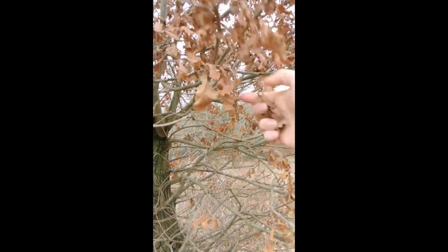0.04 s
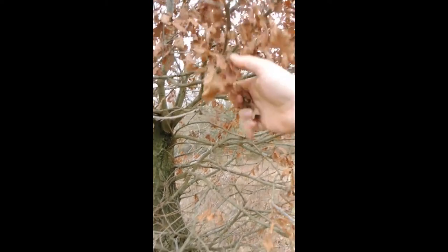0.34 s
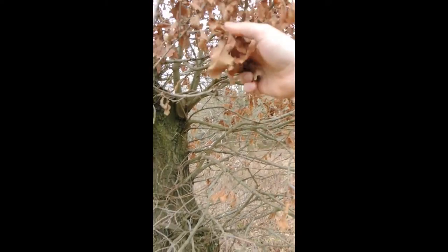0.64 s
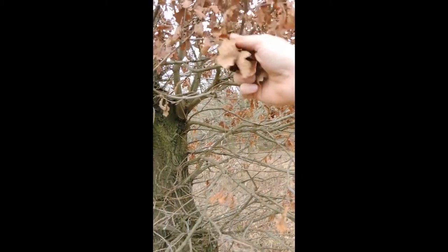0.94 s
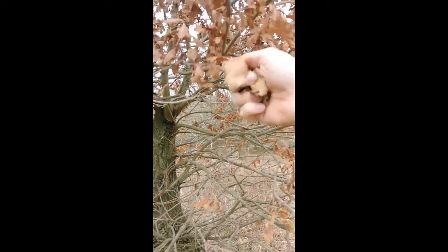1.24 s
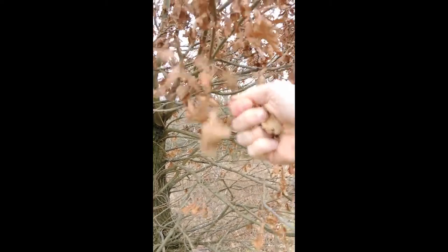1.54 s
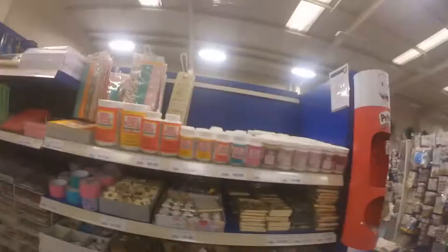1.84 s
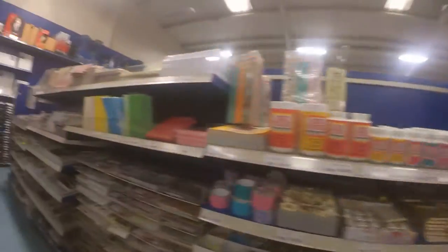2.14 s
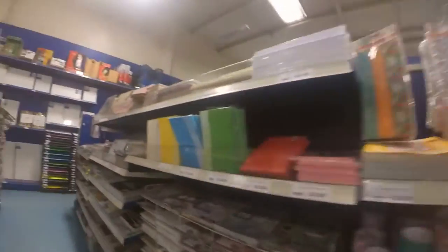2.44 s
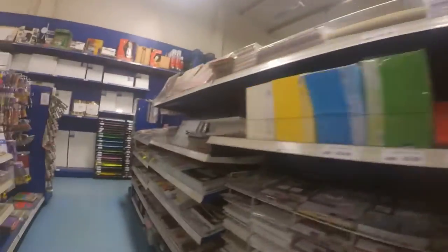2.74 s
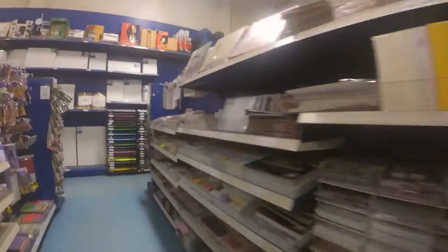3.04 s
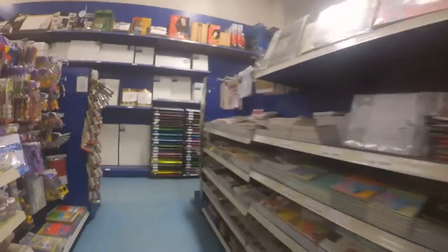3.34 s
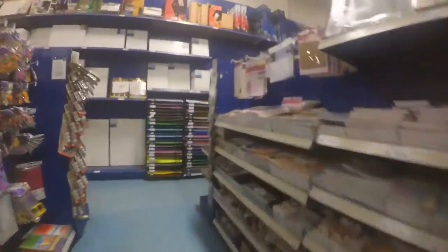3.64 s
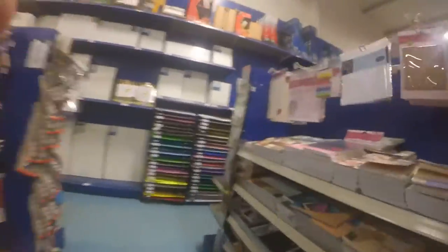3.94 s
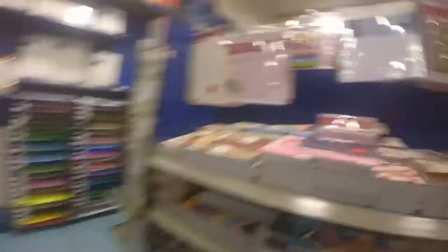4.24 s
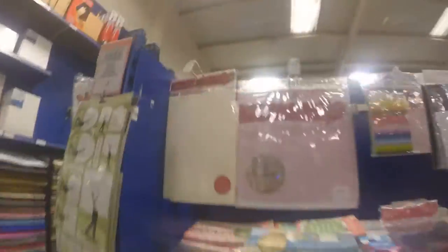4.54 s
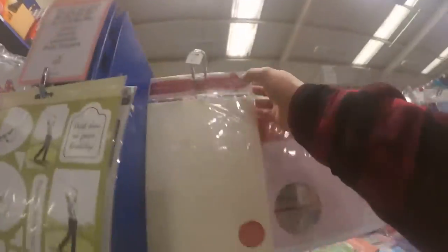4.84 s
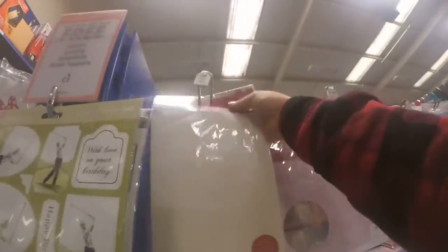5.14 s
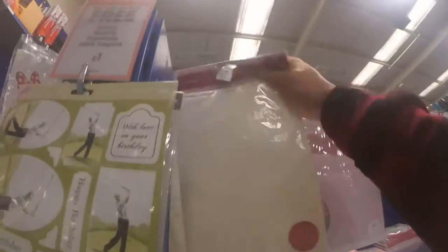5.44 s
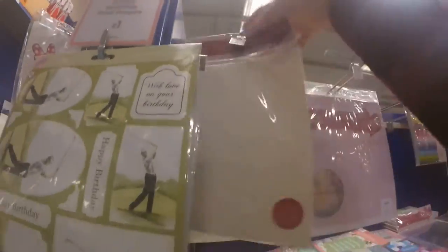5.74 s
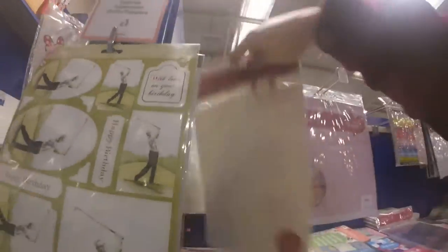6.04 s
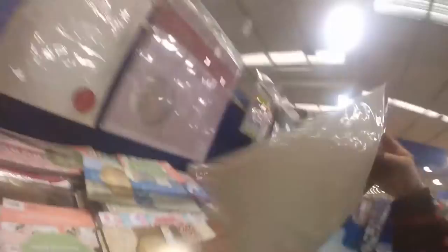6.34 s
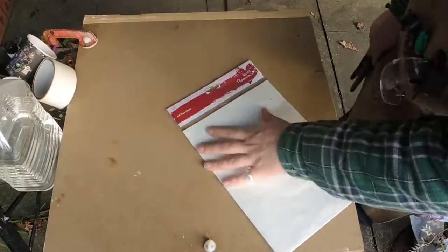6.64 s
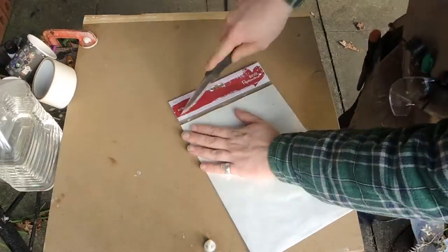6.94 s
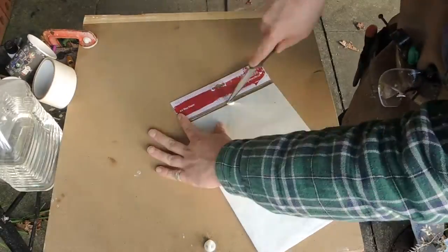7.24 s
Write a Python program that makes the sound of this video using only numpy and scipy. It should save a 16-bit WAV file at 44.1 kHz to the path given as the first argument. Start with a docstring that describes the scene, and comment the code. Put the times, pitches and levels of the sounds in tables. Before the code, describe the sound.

Dry leaves crackle loudly in a hand, then clothing rubs softly against the microphone, plastic crinkles, and a knife slits a packet open.

```python
"""Dead oak leaves crackle and snap as a hand crushes them and tears them off a twig, over distant traffic.
Hard cut to a quiet shop: clothing sticks and slips on the hollow case of a body-worn camera, and a card
in plastic film slides and crinkles off its hook. Hard cut to a board outdoors: a hand slides the packet
into place and a knife slits it open, fibres tearing, blade squeaking and board rasping, while a low
drone comes and goes with the strokes."""
import sys
import numpy as np
from scipy import signal
from scipy.fft import rfft, irfft, next_fast_len
from scipy.io import wavfile
from scipy.ndimage import uniform_filter1d

SR = 44100
rng = np.random.default_rng(int(sys.argv[2]) if len(sys.argv) > 2 else 0)


def inscribe(sig):
    """Save sig as 16-bit PCM at rate SR to the path in sys.argv[1].

    A 1-D sig is mono; a 2-D sig holds one channel per row.
    Samples are clipped to [-1, 1] before scaling.
    """
    pcm = np.round(np.clip(np.atleast_2d(sig).T, -1, 1) * 32767)
    wavfile.write(sys.argv[1], SR, pcm.astype(np.int16))


N = 330044
TIME = np.arange(N) / SR
SHOP_AT_S, BOARD_AT_S = 1.852, 6.563

# swells of cloth against the camera: peak t/s, rise/s, fall/s, case level/dB, hiss level/dB
CLOTH_RUBS = [(2.617, 0.026, 0.016, -58.5, -65), (3.055, 0.11, 0.039, -61, -67),
              (3.123, .03, .03, -65, -84), (3.31, 0.045, .07, -71.5, -77), (3.645, .14, .06, -67, -67),
              (3.853, .012, 0.074, -60, -54), (3.94, 0.062, 0.054, -48, -53),
              (3.988, .035, 0.052, -40, -47), (4.024, .05, 0.01, -48, -50),
              (4.072, 0.032, 0.034, -54.5, -55.5), (4.148, 0.029, 0.037, -36.5, -34.5),
              (4.3, 0.038, 0.022, -38.5, -39.5), (4.44, .07, 0.11, -67, -64),
              (4.513, 0.032, 0.041, -57.5, -55.5), (4.605, .015, .05, -76, -63),
              (4.635, 0.031, 0.042, -60.5, -68), (4.914, 0.027, 0.04, -62.5, -66.5),
              (6.236, 0.027, 0.02, -55, -66.5), (6.273, .025, 0.036, -57, -64),
              (6.452, 0.11, 0.052, -52, -54.5), (6.545, 0.033, 0.068, -43.5, -49)]


def from_db(db):
    """Decibels to gain."""
    return 10 ** (np.asarray(db) / 20)


def rms_one(x):
    """Scale to unit power."""
    return x / np.sqrt(np.mean(x ** 2) + 1e-20)


def in_time(rows):
    """Read a (t/s, value) curve at every sample."""
    return np.interp(TIME, *np.transpose(rows))


def at_hz(points, hz):
    """Read a (f/Hz, value) curve on a log-frequency axis."""
    f, value = np.transpose(points)
    return np.interp(np.log(hz + 1e-3), np.log(f), value)


def gate(start, end, edge=0.0026):
    """Open between two times, with short ramps."""
    return np.clip((TIME - start) / edge + .5, 0, 1) * np.clip((end - TIME) / edge + .5, 0, 1)


def burst(start, length, release, attack=0.0022):
    """Envelope with a linear attack, a hold and an exponential release."""
    return np.clip((TIME - start) / attack, 0, 1) * np.exp(-np.clip((TIME - start - length) / release, 0, 20))


def swell(start, length):
    """Half-sine envelope."""
    return np.sin(np.pi * np.clip((TIME - start) / length, 0, 1))


def strokes(rows, range_db=22.5, roundness=0.95):
    """One envelope per level column; each stroke climbs range_db over its rise and drops it over its fall."""
    power = 0
    for s, rise, fall, *levels_db in rows:
        from_peak = np.minimum(np.maximum((s - TIME) / rise, (TIME - s) / fall), 5)
        shape = from_db(-range_db * from_peak ** roundness)
        power = power + np.outer(from_db(levels_db), shape) ** 2
    return np.sqrt(power)


def drift(per_s):
    """Random wander with rms 1."""
    knots = rng.standard_normal(int(per_s * N / SR) + 2)
    return rms_one(np.interp(TIME * per_s, np.arange(len(knots)), knots))


def noise(correlation, size=N):
    """Stereo white noise, from wide (0) to mono (1)."""
    mid, side = rng.standard_normal((2, size))
    return (np.sqrt(1 + correlation) * mid + np.sqrt(1 - correlation) * side * [[1], [-1]]) / np.sqrt(2)


def grains(per_s, spread_db, t60):
    """Envelope of tiny random slips or breaks, a few larger than the rest, each dying away; rms 1."""
    born = rng.random(N) < per_s / SR
    sizes = from_db(spread_db * np.minimum(rng.exponential(1, N), 4))
    power = signal.lfilter([1], [1, -from_db(-120 / (t60 * SR))], born * sizes ** 2 + 1e-18)
    return rms_one(np.sqrt(power))


def colour(x, spectrum, size=8192):
    """Minimum-phase EQ that rolls off beyond the ends of its curve; white noise keeps its power."""
    hz = np.fft.rfftfreq(size, 1 / SR)
    octaves_outside = np.abs(np.log2((hz + 1) / np.clip(hz + 1, spectrum[0][0], spectrum[-1][0])))
    level_db = np.maximum(at_hz(spectrum, hz) - 24 * octaves_outside, -100)
    cepstrum = irfft(np.log(from_db(level_db)))[:size // 2]
    cepstrum[0] = 0
    pulse = irfft(np.exp(2 * rfft(cepstrum, size)))
    return signal.oaconvolve(x, pulse[None] / np.linalg.norm(pulse))[:, :N]


def resonate(x, hz, width_hz):
    """Resonant band-pass with unity gain at its peak."""
    r = np.exp(-np.pi * width_hz / SR)
    poles = [1, -2 * r * np.cos(2 * np.pi * hz / SR), r * r]
    return signal.lfilter(np.array([1, 0, -1]) * (1 - r * r) / 2, poles, x)


def ring(hits, hz, t60):
    """Each hit (t/s, level/dB) sets a dying sine ringing."""
    s, level_db = np.transpose(hits)
    clicks = np.full(N, 1e-18)
    clicks[np.round(s * SR).astype(int)] = from_db(level_db)
    r, w = from_db(-60 / (t60 * SR)), 2 * np.pi * hz / SR
    return signal.lfilter([0, np.sin(w)], [1, -2 * r * np.cos(w), r * r], clicks)


def add(out, s, sound):
    """Lay a short stereo sound into a track."""
    at = round(s * SR)
    out[:, at:at + sound.shape[1]] += sound


def leaf_resonances(x, ripple_db, count=26):
    """Every leaf has irregular resonances of its own."""
    hz = np.geomspace(500, 16000, count)
    return colour(x, [(20, 0), *zip(hz, ripple_db * rng.standard_normal(count))], size=1024)


def crackle(grip_db, leaf_count=5):
    """Tiny breaks in blades and veins follow an uneven grip and surge as whole leaves give way."""
    # leaves collapsing: t/s, length/s, level/dB, veins relative to blade/dB
    crushes = [(0.511, 0.024, -19.5, -18.5), (0.64, 0.014, -22.5, -12), (0.651, 0.037, -16, -10),
               (0.858, 0.021, -23, -9), (1.396, .044, -17.5, -12), (1.473, 0.03, -15, -13),
               (1.599, 0.017, -5.5, -16), (1.62, 0.027, -13, -18.5), (1.657, 0.031, -9, -16),
               (1.692, 0.036, -19, -20.5)]
    blade = from_db(grip_db + 2.48 * drift(per_s=30))
    vein = blade * from_db(-10.5)
    for start, length, level_db, vein_db in crushes:
        crush = from_db(level_db) * burst(start, length, release=0.0059)
        blade = np.hypot(blade, crush)
        vein = np.hypot(vein, crush * from_db(vein_db))
    crisp, woody = np.zeros((2, 2, N))
    for _ in range(leaf_count):
        breaks = grains(per_s=480, spread_db=3.6, t60=.008) / np.sqrt(leaf_count)
        breaks = uniform_filter1d(breaks, 22)   # a crack takes half a millisecond to cross the leaf
        crisp += leaf_resonances(noise(0.72) * blade * breaks, ripple_db=3.0)
        woody += leaf_resonances(noise(.86) * vein * breaks, ripple_db=4.0)
    return crisp, woody


def ticks(grip_db, per_s=12):
    """Lesser breaks at random, as strong as the grip allows: t/s, blade level/dB, stalk level/dB."""
    when, softness = rng.random((64, 2))[:int(per_s * SHOP_AT_S)].T
    s = when * SHOP_AT_S
    blade_db = np.interp(s, TIME, grip_db) + 13.5 - softness
    return list(zip(s, blade_db, blade_db - 20))


def fracture(fall_s, tail_db, correlation, size=1800):
    """One break: a burst of a millisecond or two, a faint shiver, and resonances of its own."""
    t = np.arange(size) / SR
    attack = np.minimum(t / .0004, 1)
    decay = np.hypot(np.exp(-t / fall_s), from_db(tail_db) * np.exp(-t / .006))
    return leaf_resonances(attack * decay * noise(correlation, size), ripple_db=3.0)


def twig():
    """A short, stiff stalk pings first; then the twig knocks as stalks break from it."""
    # knocks on the twig: t/s, level/dB
    knocks = [(.658, -16.5), (.678, -25.5), (1.253, -25.5), (1.478, -21), (1.485, -20), (1.4945, -12.5),
              (1.4985, -13.5), (1.666, -19)]
    # its modes: f/Hz, level/dB, t60/s
    modes = [(1913.4, 1.5, 0.02), (2280, -6.5, .015), (2870, -10, 0.012), (3360, -7.5, .015)]
    first_snap = [(.0793, -10)]
    stalk = ring(first_snap, hz=3300, t60=0.0094) + ring(first_snap, hz=4050, t60=0.013)
    return stalk + sum(ring(knocks, hz, t60) * from_db(level_db - 1) for hz, level_db, t60 in modes)


def microphone_ports(x):
    """Two ports shift level and phase between left and right; the treble leans right."""
    # stereo balance: f/Hz, left over right/dB
    balance = [(60, -1.5), (110, 3), (200, -1), (370, -1), (690, -1), (1270, -3.5), (2330, -3), (4280, 0),
               (7880, -5.5), (14500, -2.5)]
    # stereo phase: f/Hz, left lead/rad
    lead = [(100, -0.5), (1300, 0.4), (3500, 0.56), (6000, -0.7), (8500, 1), (10300, 0.64), (13000, 2.5)]
    size = next_fast_len(N + 1024)
    hz = np.fft.rfftfreq(size, 1 / SR)
    left = from_db(at_hz(balance, hz) / 2)
    right = np.exp(-1j * at_hz(lead, hz)) / left
    return irfft(rfft(x, size) * np.array([left, right]), size)[:, :N]


def leaves():
    """Dry leaves crackle in the hand, single snaps on top: blades sound high, veins and stalks lower."""
    # how hard the fingers work: t/s, level/dB
    grip = [(0, -28.5), (.15, -32), (.2, -36.5), (.38, -30.5), (.49, -35.5), (.55, -29), (.79, -30),
            (.94, -23.5), (1.21, -28), (1.37, -27.5), (1.45, -22), (1.585, -32), (1.66, -22.5), (1.79, -30)]
    # the loudest fractures: t/s, blade level/dB, stalk level/dB
    snaps = [(.079, -2, -10), (.144, -9, -44), (0.5114, -11, -34), (0.569, -8.5, -38), (0.608, -6, -49),
             (0.655, -11, -27.5), (.747, -5.5, -36), (0.849, -3, -36), (0.8638, -3, -30), (.899, 1.5, -42),
             (1.008, -2.5, -41), (1.16, -12, -18), (1.176, -7.5, -26.5), (1.1924, -1.5, -26.5),
             (1.2078, -18, -31), (1.2421, 3, -19), (1.2516, 2, -19.5), (1.2693, -7.5, -19.5),
             (1.3002, -5.5, -23), (1.328, -4, -26), (1.347, -2, -23), (1.3704, 1, -22), (1.4168, 10, -9),
             (1.4767, 6.5, -9.5), (1.497, -2.5, -15.5), (1.551, 1, -28.5), (1.5785, -4, -27),
             (1.6013, 10.5, -11), (1.6604, 9, -10.5), (1.665, 1.5, -4), (1.7552, -8, -29),
             (1.7792, -7.5, -26.5)]
    # bright tone of the blades: f/Hz, level/dB
    blade_eq = [(300, -35.5), (1300, -22.5), (1900, -15.5), (4000, -5.5), (6500, 0), (8800, 4),
                (11000, 0.5), (13500, -5.5), (15000, -17.5)]
    # woody tone of veins and stalks: f/Hz, level/dB
    stalk_eq = [(100, -18), (400, -10), (850, -6.5), (1300, -8.5), (1900, -0.5), (2600, 0.5), (3500, 0),
                (5000, -4.5), (9000, -24)]
    grip_db = in_time(grip)
    crisp, woody = crackle(grip_db)
    for s, blade_db, stalk_db in snaps + ticks(grip_db):
        add(crisp, s, from_db(blade_db - 2.5) * fracture(fall_s=.0011, tail_db=-16.5, correlation=.41))
        add(woody, s, from_db(stalk_db + 4) * fracture(fall_s=.0017, tail_db=-18.5, correlation=.9))
    return microphone_ports(colour(crisp, blade_eq) + colour(woody, stalk_eq) + twig())


def far_traffic(engine_hz=155):
    """A low wash of traffic, and one engine whose drone comes and goes on the air."""
    # tone of the wash: f/Hz, level/dB
    wash_eq = [(12, -40.5), (20, -14.5), (55, 1), (107, -2.5), (157, -6.5), (216, -5), (623, -6.5),
               (697, -8.5), (1090, -9), (1290, -11.5), (1520, -19.5), (1700, -18), (2210, -44.5),
               (3740, -120)]
    # how the engine carries: t/s, level/dB
    carry = [(0, -56.5), (.6, -34.5), (1.05, -51), (1.35, -45), (1.85, -41)]
    wash = from_db(-38) * colour(noise(0.98), wash_eq)
    phase = 2 * np.pi * np.cumsum(engine_hz * (1 + 0.011 * drift(25))) / SR
    engine = np.sqrt(2) * (np.sin(phase) + from_db(-10) * np.sin(phase / 2))
    return wash + engine * from_db(in_time(carry) - 1)


def clothing():
    """Cloth sticks and slips on the hollow camera case; a sleeve swishes past the body."""
    # body of the rub: f/Hz, level/dB
    body_eq = [(120, -1), (220, 2), (430, -3), (560, 1), (700, -3), (880, 0.5), (1100, 2.5), (1280, 7),
               (1450, -5.5), (1700, -6)]
    # friction hiss: f/Hz, level/dB
    hiss_eq = [(1500, -12.5), (2100, 8), (2700, -0.5), (3200, 4), (3700, -3.5), (4300, -10.5), (5700, -8.5),
               (7500, -22.5), (10000, -27), (15000, -69)]
    # resonances of the case: f/Hz, width/Hz, level/dB
    case_modes = [(438, 54, -0.5), (1216, 85, -1), (2375, 98, -11.5), (2989, 96.7, -2.5), (3530, 180, -6.5),
                  (5370, 168, -22)]
    # sleeve passes: t/s, length/s, level/dB
    swishes = [(2.464, 0.058, -75), (2.91, 0.2, -73), (3.145, 0.11, -72), (3.556, 0.11, -66.5),
               (4.40, .14, -72)]
    # tone of the sleeve: f/Hz, level/dB
    sleeve_eq = [(2500, -6), (3600, 1), (5200, -6), (5750, 6), (6200, -5), (7000, -11), (10000, -17)]
    case, hiss = strokes(CLOTH_RUBS)
    slips = grains(per_s=700, spread_db=2.0, t60=0.033)
    push = noise(1.0) * case * slips
    scuff = noise(0.32) * hiss * slips
    hollow = 0
    for hz, width, level_db in case_modes:
        drive = push if hz < 1500 else scuff   # pressure moves the low modes, friction the high ones
        hollow = hollow + resonate(drive, hz, width) * from_db(level_db) * np.sqrt(SR / (np.pi * width))
    rub = colour(push, body_eq) * from_db(-1) + colour(scuff, hiss_eq) + hollow * from_db(-4)
    sleeve = sum(from_db(level_db) * swell(start, length) for start, length, level_db in swishes)
    return rub + colour(noise(0.032) * sleeve * slips, sleeve_eq)


def plastic_film():
    """Film slides along its neighbours and crinkles where it bends as the packet leaves its hook; earlier, a
    faint swish swells and fades."""
    # slides: peak t/s, rise/s, fall/s, level/dB; the first, long and very faint, is a soft swish early in the
    # shop rather than the film
    slides = [(2.05, .9, 0.82, -83), (5.57, .5, .28, -62), (6.17, 0.26, .2, -58)]
    # tone of sliding film: f/Hz, level/dB
    slide_eq = [(590, -46), (1000, -16), (1080, -43), (1330, -1), (1630, -22), (1780, 2.5), (1900, -40),
                (2340, -10.5), (2920, -2), (3150, 0), (3410, -2.5), (3850, -1.5), (4300, -15.5),
                (4800, -10.5), (14000, -28)]
    # crinkles: peak t/s, rise/s, fall/s, level/dB
    crinkles = [(5.585, .05, 0.045, -67.5), (5.665, .02, .04, -64), (6.083, 0.028, 0.085, -61),
                (6.183, 0.032, 0.039, -69), (6.327, 0.024, 0.017, -54.5), (6.354, 0.015, 0.027, -43),
                (6.398, 0.024, 0.058, -50.5)]
    # tone of bending film: f/Hz, level/dB
    crinkle_eq = [(180, -36), (300, -14), (1120, -8), (1320, -8), (2630, -7), (3400, -2.5), (4060, -12),
                  (6680, -12), (10300, -29), (14000, -28)]
    sliding = noise(.3) * strokes(slides) * grains(per_s=600, spread_db=1.0, t60=.012)
    sliding *= from_db(2 + 2.9 * drift(28))
    bending = noise(0.33) * strokes(crinkles) * grains(per_s=660, spread_db=1.0, t60=0.01)
    return colour(sliding, slide_eq) + colour(bending, crinkle_eq)


def among_shelves(x, left_lag_s=.00084, t60=.035, wet_db=-3, size=2048):
    """Close sound reaches the left microphone late; dense short reflections ripple its spectrum."""
    direct = np.array([np.roll(x[0], round(left_lag_s * SR)), x[1]])
    pulse = rng.standard_normal((2, size)) * from_db(-60 * np.arange(size) / (t60 * SR))
    pulse *= from_db(wet_db) / np.linalg.norm(pulse, axis=1, keepdims=True)
    pulse[:, 0] += 1
    pulse /= np.linalg.norm(pulse, axis=1, keepdims=True)
    return signal.oaconvolve(direct, pulse, axes=1)[:, :N]


def camera_rumble(cutoff_hz=146.6):
    """The camera sways with the walk, is shoved by the cloth and bumps softly on the chest."""
    # depth of the sway: t/s, level/dB
    walk = [(1.87, -49.5), (2.2, -66.5), (2.85, -57.5), (3.13, -49), (3.45, -66.5), (3.95, -45),
            (4.45, -53.5), (5.25, -64), (6.05, -60.5), (6.5, -39.5)]
    # its sub-bass tone: f/Hz, level/dB
    sway_eq = [(7.1, -32), (12, 19.5), (20, -1), (52, -11), (93, -23.5), (125, -28.5), (200, -23),
               (260, -45), (440, -120)]
    # chest bumps: t/s, level/dB
    bumps = [(2.225, -52), (2.935, -40.5), (3.135, -36), (3.305, -51), (3.645, -42), (3.85, -40.5),
             (4.055, -34), (4.14, -40), (4.29, -33), (4.63, -36.5), (4.715, -39.5), (4.91, -42),
             (5.115, -44.5), (6.47, -30), (6.535, -33.5)]
    sway = colour(noise(0.19), sway_eq) * from_db(in_time(walk) + 2.5 + 5.3 * drift(16))
    shove = rms_one(resonate(noise(.3), hz=80, width_hz=46)) * strokes(CLOTH_RUBS)[0] * from_db(-4.5)
    thuds = ring(bumps, hz=27.9, t60=0.077) * from_db(2.5)
    return signal.sosfilt(signal.butter(4, cutoff_hz, fs=SR, output="sos"), sway + shove + thuds)


def squeaks(rows, waver, climb_per_s=0):
    """Brief chatter at an unsteady pitch, which climbs if the contact tightens."""
    out = np.zeros(N)
    unsteady = 1 + waver * drift(500)
    for start, length, hz, level_db in rows:
        glide = 1 + climb_per_s * np.clip(TIME - start - length / 2, -length, length)
        phase = 2 * np.pi * np.cumsum(hz * unsteady * glide) / SR
        out += from_db(level_db + 2.5) * swell(start, length) * np.sin(phase)
    return out


def shop_ambience():
    """Hushed room tone with faint squeaks far off."""
    # room tone: f/Hz, level/dB
    room_eq = [(59, -55), (100, -6), (120, -9), (337, -13.5), (452, -16), (520, -18), (659, -17),
               (902, -26), (1070, -18), (1200, -20), (2370, -19.5), (2570, -17), (3040, -21), (5360, -22.5),
               (15000, -29)]
    # distant squeaks: t/s, length/s, f/Hz, level/dB
    far_squeaks = [(1.9, 0.17, 2858, -85), (1.96, 0.18, 3835, -86), (2.05, 0.089, 2584, -78),
                   (2.14, .07, 2595, -80), (2.33, .2, 2852, -85)]
    return from_db(-79.5) * colour(noise(.1), room_eq) + squeaks(far_squeaks, waver=0.013)


def hook_clinks():
    """A small metal hook is touched twice and rings."""
    return ring([(2.617, -67), (3.118, -64)], hz=2600, t60=0.063)


def mount_creak():
    """The loaded mount sticks and slips ever faster, sounding through a low resonance of the case."""
    # course of the creak: t/s, slip rate/Hz, level/dB
    creak = [(3.965, 220, -64), (3.979, 280, -44), (3.996, 450, -43), (4.01, 420, -46), (4.03, 540, -56),
             (4.04, 650, -74)]
    s, per_s, level_db = np.transpose(creak)
    rate = np.interp(TIME, s, per_s) * (1 + 0.03 * drift(300))
    slips = np.diff(np.floor(np.cumsum(rate) / SR), prepend=0)
    envelope = from_db(np.interp(TIME, s, level_db)) * gate(s[0], s[-1])
    return rms_one(resonate(slips, hz=355, width_hz=150)) * envelope


def packet_envelopes(resting_db=(-58.5, -54, -56.5)):
    """Gains of paper, board rasp and low drone: a resting level, pressing strokes and sudden catches."""
    # strokes of palm and blade: t/s, length/s, paper level/dB, rasp level/dB, drone level/dB
    presses = [(6.652, 0.13, -55.5, -62, -46.5), (6.783, 0.088, -70, -51, -40.5),
               (6.912, 0.08, -51, -48, -51), (7.061, 0.25, -50.5, -48, -33), (7.217, 0.17, -40.5, -31, -44)]
    # the packet catching, the blade breaking through: t/s, length/s, paper level/dB, rasp level/dB
    catches = [(6.736, 0.0099, -40, -67), (6.824, 0.018, -46.5, -44), (6.857, 0.0079, -29.5, -55),
               (7.07, 0.015, -30.5, -28), (7.254, 0.017, -40, -27.5), (7.36, 0.024, -39.5, -28.5),
               (7.383, 0.014, -31, -25)]
    power = from_db(resting_db)[:, None] ** 2
    for start, length, *levels_db in presses:
        power = power + np.outer(from_db(levels_db), burst(start, length, release=.014, attack=.015)) ** 2
    for start, length, *levels_db in catches:
        power[:2] += np.outer(from_db(levels_db), burst(start, length, release=.0058)) ** 2
    return np.sqrt(power)


def low_drone(drone_hz=39):
    """A low, slightly unsteady buzz in a bed of rumble."""
    # partials of the buzz: harmonic number, level/dB
    partials = [(1, -16), (2, 0.5), (3, -5.5), (4, -8), (5, -13.5), (6, -20), (7, -20)]
    # tone of the rumble: f/Hz, level/dB
    rumble_eq = [(24, -18), (40, -8), (48, -20), (65, -13), (80, -1), (139, -6), (167, -4), (220, -28),
                 (290, -19.5), (480, -120)]
    phase = 2 * np.pi * np.cumsum(drone_hz * (1 + 0.014 * drift(30))) / SR
    buzz = sum(from_db(db) * np.sin(order * (phase + rng.uniform(0, 2 * np.pi))) for order, db in partials)
    return buzz * from_db(-1) + colour(noise(0.54), rumble_eq) * from_db(-9)


def packet_on_board():
    """Fibres tear under palm and squeaking blade, the board rasps; a low drone follows the strokes."""
    # tone of tearing paper: f/Hz, level/dB
    paper_eq = [(820, -19), (1400, -14.5), (1790, -8.5), (2200, -9.5), (2780, -5), (3690, -8),
                (4350, -11.5), (7750, -9), (10200, -7), (13500, -16.5), (14500, -34)]
    # the blade squeaking in the cut: t/s, length/s, f/Hz, level/dB
    blade_squeaks = [(7.137, 0.017, 2640, -48), (7.144, 0.025, 3440, -46), (7.196, 0.022, 2930, -41.5),
                     (7.209, 0.036, 3440, -40), (7.269, 0.03, 3270, -41.5), (7.29, 0.034, 2910, -43)]
    # tone of the rasping board: f/Hz, level/dB
    board_eq = [(120, -33), (200, -12.5), (328, -5), (412, -1.5), (457, -2), (499, 1), (593, -7),
                (744, -10), (958, -17), (1600, -11), (2080, -17.5), (3520, -120)]
    paper, rasp, drone_gain = packet_envelopes()
    fibres = grains(per_s=1600, spread_db=4.0, t60=0.04) * from_db(2 * drift(45))
    tear = colour(noise(0.018) * paper * fibres, paper_eq) * from_db(-0.07)
    blade = squeaks(blade_squeaks, waver=0.035, climb_per_s=3.0)
    cut = (tear + blade) * from_db([[-3], [2.2]])   # panned right
    body = colour(noise(0.21) * rasp * fibres, board_eq) * from_db(-8.5)
    return cut + body + drone_gain * low_drone()


def outdoor_ambience():
    """Open air around the board, with a faint steady hum."""
    # tones of the hum: f/Hz, level/dB
    tones = [(75.4, -65), (172.3, -64), (236.9, -64.5), (301.5, -64)]
    # tone of the air: f/Hz, level/dB
    air_eq = [(15, -46), (25, -16), (58, 1.5), (87, 1.5), (155, -3.5), (202, -4), (511, -11), (554, -8),
              (1400, -19.5), (2780, -28), (5690, -29.5), (9920, -39), (14000, -31)]
    hum = sum(from_db(level_db + 3.5) * np.sin(2 * np.pi * hz * TIME) for hz, level_db in tones)
    return hum + from_db(-49.5) * colour(noise(0.23), air_eq)


def last_rip():
    """The fold gives way with a double click as the blade leaves it."""
    return ring([(7.386, -27), (7.391, -21.5)], hz=1960, t60=0.024)


def scene():
    """Wood, shop and board, joined by hard cuts."""
    wood = far_traffic() + leaves()
    close_up = among_shelves(clothing() + plastic_film())
    shop = close_up + camera_rumble() + shop_ambience() + hook_clinks() + mount_creak()
    board = packet_on_board() + outdoor_ambience() + last_rip()
    return (wood * gate(-1, SHOP_AT_S) + shop * gate(SHOP_AT_S, BOARD_AT_S)
            + board * gate(BOARD_AT_S, N / SR + 1))


def record(dry, cutoff_hz=14700):
    """The loudest cracks clip; a steep low-pass takes off the top."""
    return signal.sosfilt(signal.ellip(8, .2, 65, cutoff_hz, fs=SR, output="sos"), np.clip(dry, -1, 1))


dry = scene()
out = record(dry)
inscribe(out)
```